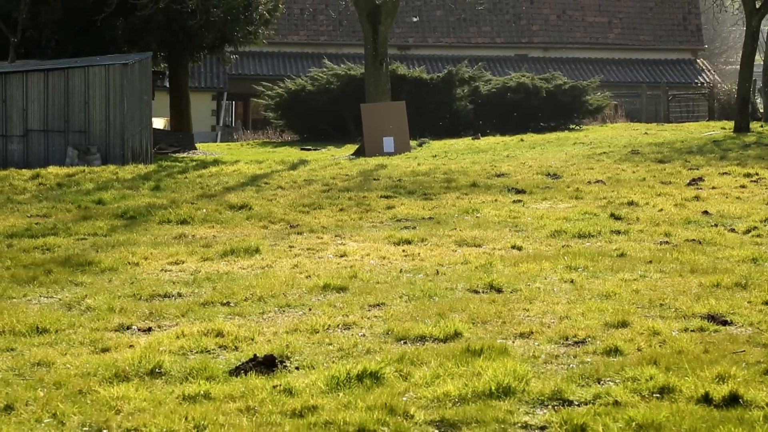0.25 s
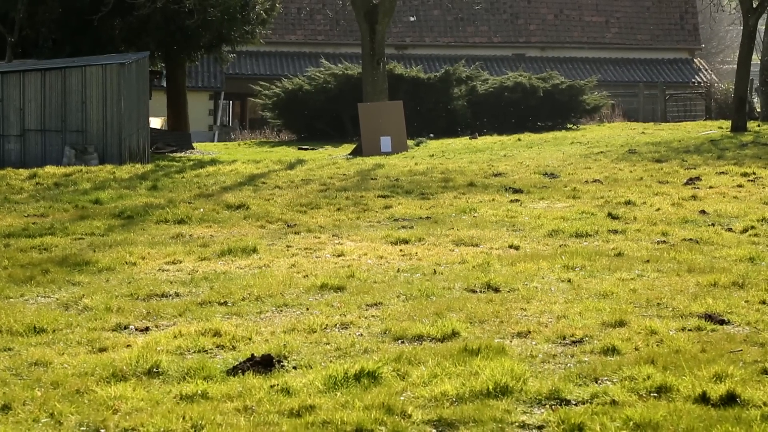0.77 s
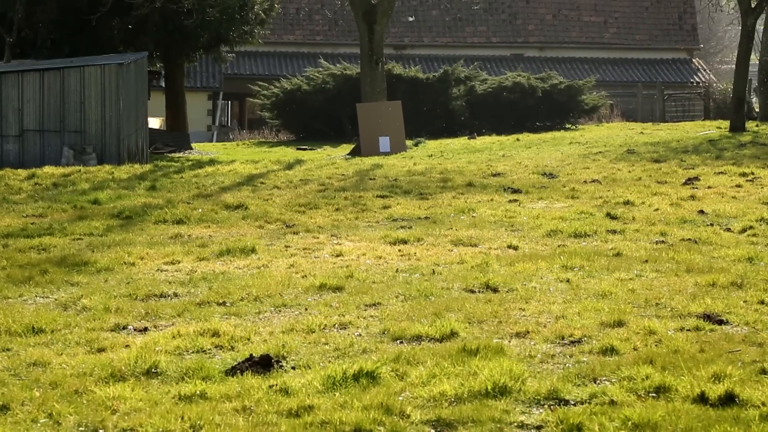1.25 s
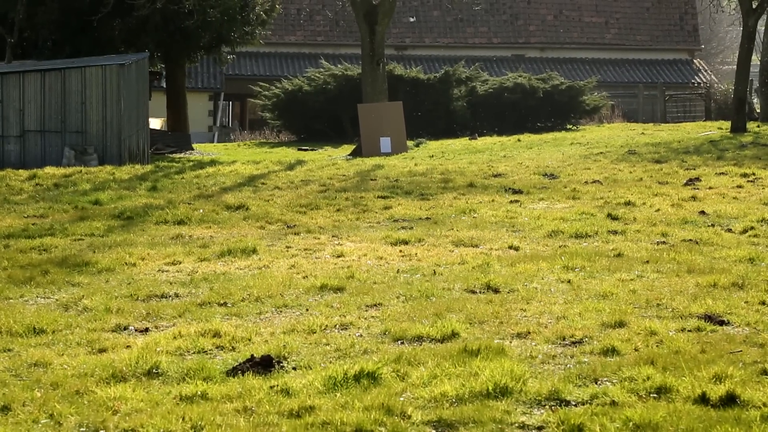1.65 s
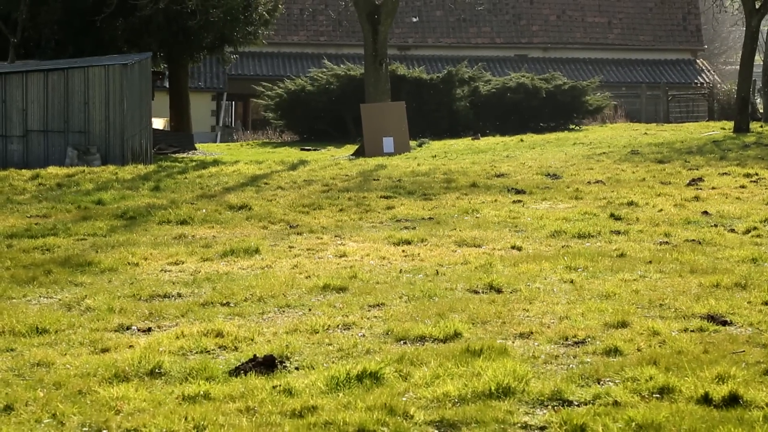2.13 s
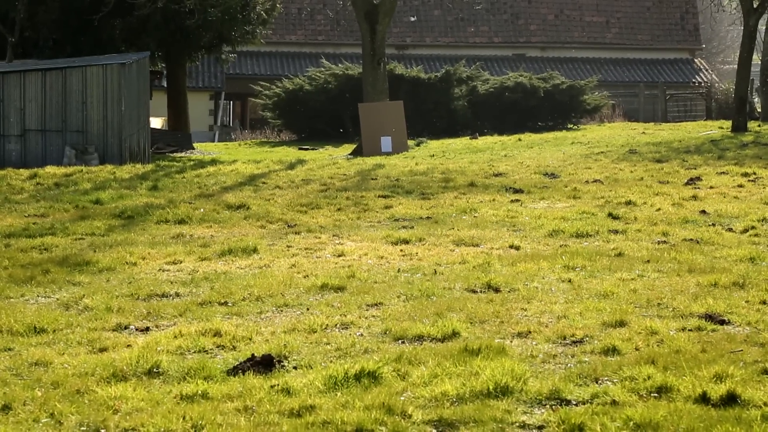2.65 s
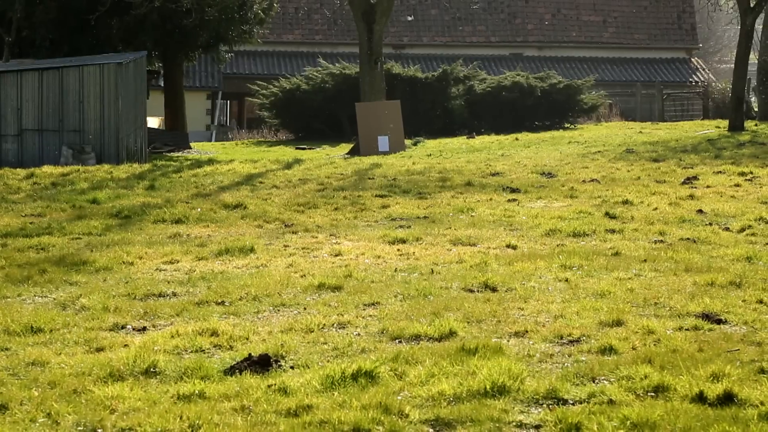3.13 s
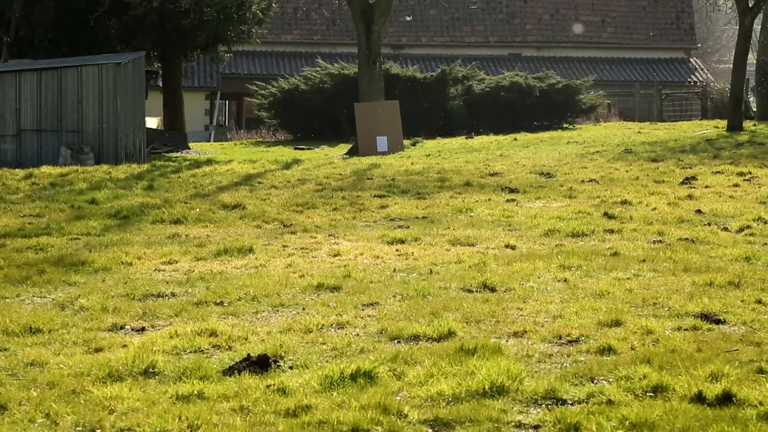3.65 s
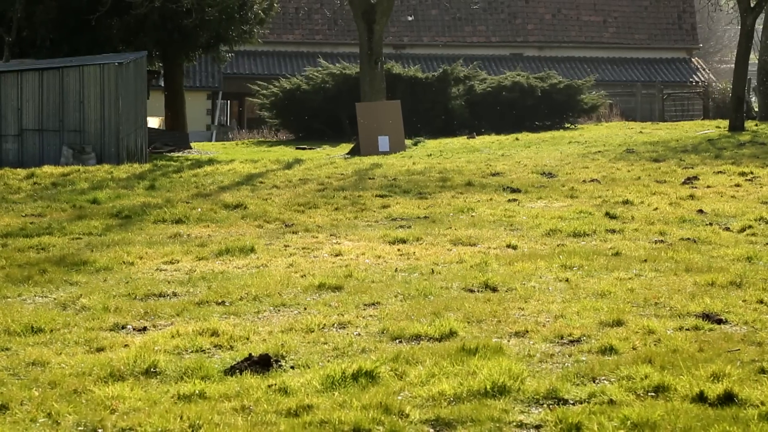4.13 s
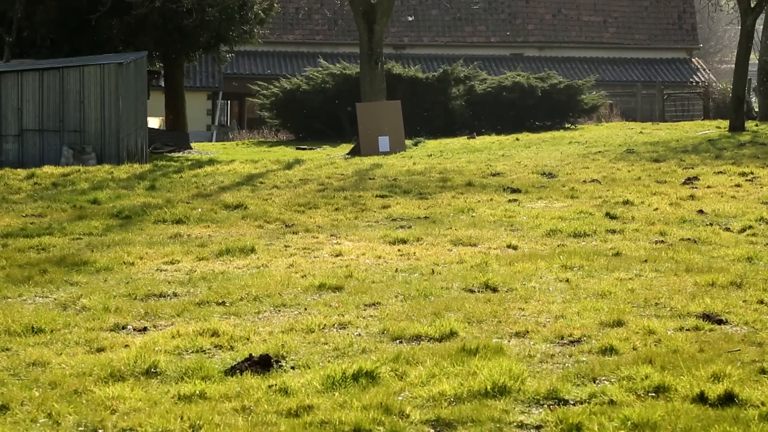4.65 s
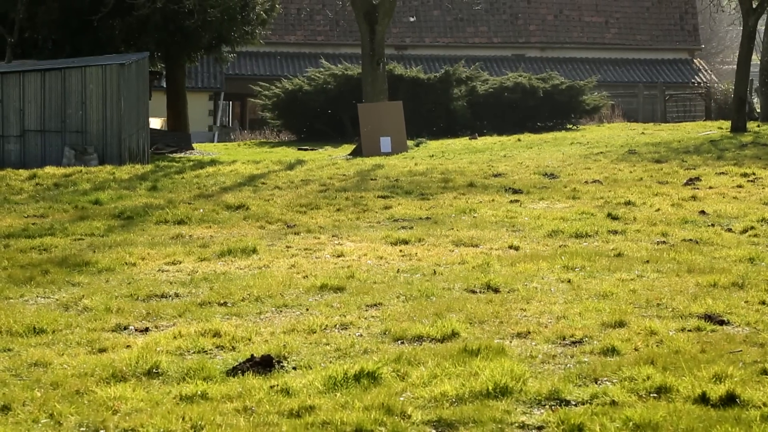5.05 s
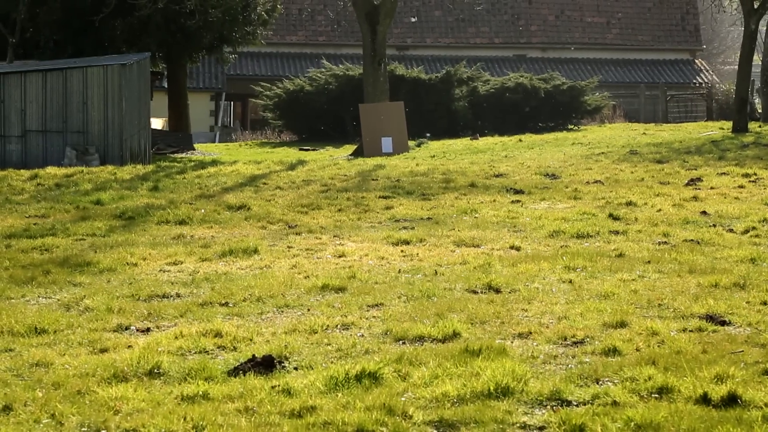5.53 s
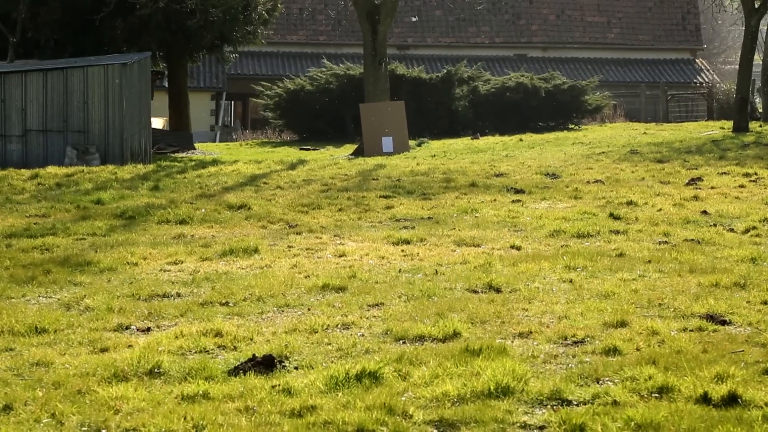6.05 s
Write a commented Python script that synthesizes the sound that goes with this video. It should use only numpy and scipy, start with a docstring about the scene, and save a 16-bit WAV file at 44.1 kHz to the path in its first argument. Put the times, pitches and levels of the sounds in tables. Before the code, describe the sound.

An electric airsoft rifle fires sharp single shots close by, each with a gear whirr, while pellets knock faintly on distant cardboard outdoors.

```python
"""Faint garden air on a lawn. From 0.25 s an electric pellet rifle fires 13 single shots by the microphone:
the motor winds the gears, the piston slams and overloads the input, the gears coast and latch.
Ground and yard echo each shot. From 1.15 s birds sing briefly in gliding near sines.
From 1.4 s five pellets knock on distant cardboard, each a second after its shot;
four short, faint clicks follow each knock as the pellet bounces."""
import sys
import numpy as np
from scipy import signal
from scipy.fft import rfft, irfft
from scipy.io import wavfile
from scipy.ndimage import uniform_filter1d

SR = 44100
rng = np.random.default_rng(int(sys.argv[2]) if len(sys.argv) > 2 else 0)


def put_to_file(sound):
    """Save the sound as 16-bit audio at rate SR, in the file named by the first command-line argument."""
    columns = np.atleast_2d(sound).T  # one column per channel
    safe = np.clip(columns, -1, 1)
    whole_steps = np.round(safe * 32767)
    wavfile.write(sys.argv[1], SR, whole_steps.astype(np.int16))


N = 277389

# Shots. Each row: slam time in seconds, slam level in dB, coasting level in dB, re-engage clack in dB.
SHOTS = [(0.3489, 7.5, -46, -10), (0.7442, 7.5, -42, -11), (1.0144, 8, -41, -9.5), (2.5356, 8, -44.5, -7.5),
         (2.8279, 7, -41, -10.5), (3.3601, 8.5, -45, -10.5), (3.6274, 9.5, -41, -11.5),
         (3.8975, 8, -41.5, -10), (4.155, 6, -39, -10), (5.2154, 6.5, -33, -10.5), (5.5206, 7, -46, -8),
         (5.7745, 6, -41, -9), (6.0823, 7.5, -45, -11.5)]


def undb(db):
    return 10 ** (np.asarray(db) / 20)


def unit(x):
    return x / np.sqrt(np.mean(x ** 2))


def band(x, hz, width_hz):
    """Two-pole resonance, gain 1 at the centre."""
    return signal.lfilter(*signal.iirpeak(hz, hz / width_hz, fs=SR), x)


def butter(x, order, hz, kind):
    return signal.sosfilt(signal.butter(order, hz, kind, fs=SR, output="sos"), x)


def fall(t, t60_s):
    """Silent before 0 s, then decaying."""
    return (t >= 0) * np.exp(-np.log(1000) * np.maximum(t, 0) / t60_s)


def add(out, start_s, x):
    i = int(start_s * SR)
    out[i:i + len(x)] += x[:N - i]


def burst(t, hz, width_hz, t60_s, rise_s):
    """Noise that swells and dies in a steep resonance."""
    shape = fall(t, t60_s) * (1 - np.exp(-np.maximum(t, 0) / rise_s))
    x = band(band(rng.standard_normal(len(t)) * shape, hz, width_hz), hz, width_hz)
    return unit(x) * np.sqrt(np.mean(shape ** 2))


def flicker(rate_hz, depth_db):
    """Randomly wandering gain."""
    k = int(SR / rate_hz)
    return undb(depth_db * unit(uniform_filter1d(uniform_filter1d(rng.standard_normal(N), k), k)))


def reverb(x, tail):
    return signal.fftconvolve(x, tail / np.sqrt(np.sum(tail ** 2)))[:N]


def air():
    """Faint hiss of garden and preamplifier, swelling slowly."""
    # Hiss spectrum. Each row: frequency in Hz, relative density in dB.
    spectrum = [(40, -30.5), (100, -8), (200, -7), (400, -4), (800, -4.5), (1400, -4), (2500, -7.5),
                (5000, -9.5), (9000, -16), (13400, -16), (14200, -44)]
    hz, db = np.transpose(spectrum)
    bins_hz = np.maximum(np.arange(N // 2 + 1) * SR / N, 1)
    gain = undb(np.interp(np.log(bins_hz), np.log(hz), db))
    hiss = irfft(rfft(rng.standard_normal(N)) * gain, N)
    swell = unit(uniform_filter1d(rng.standard_normal(N), SR // 4))
    return undb(-61.5 + 0.76 * swell) * unit(hiss)


def gears():
    """Teeth mesh faster as the motor spins up; strikes and friction ring the shell; coasting is dull."""
    # Shell modes under the teeth. Each row: frequency in Hz, width in Hz, relative gain in dB.
    modes = [(313, 330, -20.5), (548, 140, -1.5), (894, 737, -5.5), (1374, 594, -3), (2158, 220, 1),
             (2680, 420, -5.5), (3230, 240, -3), (4305, 910, -10.5), (7590, 520, -12.5),
             (9800, 12000, -24.5)]
    wind_up_s, coast_after_s, full_mesh_hz, growl_hz = 0.1, 0.024, 1000, 480
    t = np.arange(N) / SR
    speed, drive, coast = np.zeros((3, N))
    for slam_s, _, coast_db, _ in SHOTS:
        on = t > slam_s - wind_up_s
        slack = fall(t - slam_s + wind_up_s, 0.11)  # missing share of full speed
        braked_s = np.maximum(t - slam_s - coast_after_s, 0)
        speed = np.maximum(speed, on * (1 - slack) * fall(braked_s, 0.8))
        idle = np.exp(-((t - slam_s - 0.023) / 0.021) ** 2)  # unloaded until re-engagement
        drive += on * undb(-23 - 22 * slack - 2.5 * idle) * fall(braked_s, 0.22)
        coast += (t > slam_s) * undb(coast_db) * fall(braked_s, 0.28)
    teeth = np.cumsum(speed * full_mesh_hz * (1 + 0.35 * rng.standard_normal(N))) / SR
    strikes = np.diff(np.floor(teeth), prepend=0) * undb(5 + 2.3 * rng.standard_normal(N))
    force = strikes + rng.standard_normal(N)
    bright = 0
    for k, (hz, width_hz, db) in enumerate(modes):
        flare = flicker(190, 2.63)  # the contact point wanders
        hardness = speed ** (hz / 6900)  # slow teeth miss the high modes
        bright += (-1) ** k * undb(db) * flare * hardness * band(force, hz, width_hz)
    bright = unit(bright)
    growl = unit(band(band(force, growl_hz, 250), growl_hz, 250))  # the slowing motor
    dull = unit(band(bright, 1400, 2200)) + undb(-14) * bright + undb(-4) * growl
    whirr = drive * bright + coast * flicker(120, 3.9) * dull
    return butter(whirr, 2, 330, "high")  # the small shell radiates no bass


def knock(hz, db, crack_db, body_db, t60_s):
    """Small metal blow: main ring, bright crack, dull body."""
    t = np.arange(SR // 16) / SR
    ring = burst(t, hz, 1500, t60_s, 0.0011)
    crack = undb(crack_db) * burst(t, 3700, 10000, 0.5 * t60_s, 0.00027)
    body = undb(body_db) * burst(t - 0.0017, 620, 600, 1.7 * t60_s, 0.00071)
    return undb(db) * (ring + crack + body)


def slam():
    """The piston rings the gearbox shell, never twice alike; air puffs from the muzzle."""
    # Shell modes under the slam. Each row: frequency in Hz, relative level in dB, t60 in seconds.
    modes = [(308, -17, 0.0056), (467, -6.5, 0.011), (946.3, 6.5, 0.008), (1214, 6.5, 0.005),
             (2195.5, 8, 0.0051), (2700, -6, 0.0024), (3465, 1, 0.0078), (5304, -7, 0.0098),
             (8370, -26, 0.016)]
    rise_s = 0.000067
    t = np.arange(SR // 12) / SR
    ring = 0
    for k, (hz, db, t60_s) in enumerate(modes):
        spread_db, detune = rng.normal(0, [0.51, 0.01])
        tone = np.sin(2 * np.pi * hz * (1 + detune) * t)
        ring += (-1) ** k * undb(db + spread_db) * tone * fall(t, t60_s)
    puff = undb(-19) * unit(band(rng.standard_normal(len(t)), 2400, 7300)) * fall(t, 0.013)
    return (1 - np.exp(-t / rise_s)) * (ring + puff)


def piston():
    """Release knock, slam with spring hum, clack as the gears re-engage."""
    out, t = np.zeros(N), np.arange(SR) / SR
    for slam_s, slam_db, _, clack_db in SHOTS:
        add(out, slam_s + 0.00066, undb(slam_db) * slam())
        add(out, slam_s - 0.0165, knock(hz=1700, db=-20, crack_db=5.3, body_db=3.6, t60_s=0.034))
        add(out, slam_s + 0.0395, knock(hz=1600, db=clack_db, crack_db=-11.5, body_db=-13.5, t60_s=0.026))
        spring = unit(band(rng.standard_normal(SR), hz=1430, width_hz=70))
        add(out, slam_s, undb(-58.5) * spring * fall(t, t60_s=2.4))
    return out


def latches():
    """Latches, trigger and single teeth click; each sets a small steel pawl shivering."""
    # Each row: start in seconds, level in dB, body knock in dB relative to the ring.
    clicks = [(0.4338, -17.5, -6.5), (0.4418, -23.5, -6.5), (0.8137, -17.5, -16), (0.828, -18.5, -11),
              (1.092, -22, -26), (1.0997, -17.5, -13), (2.4372, -31, -9), (2.5939, -15.5, -22),
              (2.9444, -15.5, -5), (2.9655, -31.5, -10), (3.1067, -19.5, -27.5), (3.2151, -49, -14.5),
              (3.2286, -43.5, -5), (3.4348, -18.5, -26), (3.4428, -21, -11), (3.4554, -27.5, -5.5),
              (3.7319, -11.5, -5), (3.7579, -19, -10.5), (4.0086, -11.5, -5.5), (4.0345, -18.5, -6.5),
              (4.2614, -15.5, -5), (4.2823, -28.5, -16), (5.3219, -18, 0.5), (5.3468, -23, -7.5),
              (5.6236, -13, -3), (5.6487, -21, -12), (5.6613, -34, -3), (5.879, -15, -2),
              (5.906, -20.5, -9), (5.98, -28.5, -9), (6.1892, -20.5, -3)]
    # Pawl modes. Each row: frequency in Hz, level in dB relative to the click.
    pawl = [(2180, -24), (5660, -33), (7220, -31), (8780, -36), (10900, -34)]
    out, t = np.zeros(N), np.arange(SR // 12) / SR
    for start_s, db, body_db in clicks:
        add(out, start_s, knock(hz=2180, db=db, crack_db=-10, body_db=body_db, t60_s=0.02))
        for hz, mode_db in pawl:
            gain = undb(db + mode_db + 4.2 * rng.standard_normal())
            add(out, start_s, gain * burst(t, hz, width_hz=250, t60_s=0.069, rise_s=0.004))
    return out


def shell_rings():
    """Short rings of the gearbox shell."""
    # Each row: time in seconds, level in dB, frequency in Hz.
    rings = [(0.9475, -2.5, 2275), (2.46, -6.5, 2080), (2.5686, -5.5, 2160), (2.8554, -13.5, 2220),
             (3.1073, -25.5, 2193), (3.2849, -19.5, 2190), (3.5593, -5, 2320), (3.8262, -6, 2240),
             (4.0773, -6, 2030), (5.8107, -2.5, 2050), (6.0043, -5, 1980), (6.111, -7, 2160)]
    out, t = np.zeros(N), np.arange(SR // 12) / SR
    for time_s, db, hz in rings:
        add(out, time_s - 0.002, undb(db) * burst(t, hz, width_hz=300, t60_s=0.03, rise_s=0.0055))
    return out


def surroundings(gun):
    """The ground returns a duller copy, which bounces once more; walls and trees scatter a faint tail."""
    # Gain in dB of the first and second ground return.
    returns_db = [-15.5, -28]
    lag_s = 0.00378
    out, t = gun.copy(), np.arange(SR) / SR
    dull = band(gun, 1000, 2200)
    for k, db in enumerate(returns_db, 1):
        add(out, k * lag_s, undb(db) * dull)
    yard = band(rng.standard_normal(SR), 1500, 4200) * fall(t - 0.032, t60_s=0.6)
    return out + undb(-44.5) * reverb(out, yard)


def birds():
    """Near sines that glide, swell, fade and waver with distance; foliage smears them."""
    # Each row: start in seconds, length in seconds, first and last pitch in Hz, mid-note level in dB.
    notes = [(1.154, .08, 4080, 4180, -62), (1.267, 0.047, 4130, 4150, -58.5),
             (1.568, 0.082, 4350, 3750, -59.5), (1.641, 0.032, 4000, 5000, -59),
             (1.679, 0.05, 4296, 4080, -54.5), (1.815, .045, 4900, 3650, -60),
             (1.824, 0.37, 3130, 2810, -51), (1.888, 0.044, 3950, 4300, -58),
             (1.938, 0.031, 5240, 4100, -60), (1.987, 0.089, 4170, 3900, -64),
             (2.107, .05, 4120, 4090, -70), (2.224, .07, 4270, 4340, -74)]
    swell_db = 16.5
    song, t = np.zeros(N), np.arange(N) / SR
    wobble = flicker(60, 0.06)
    for start_s, length_s, first_hz, last_hz, db in notes:
        progress = np.clip((t - start_s) / length_s, 0, 1)
        swell = (progress > 0) * (progress < 1) * undb(db - swell_db * (2 * progress - 1) ** 2)
        pitch_hz = (first_hz + (last_hz - first_hz) * progress) * wobble
        song += np.sqrt(2) * swell * np.sin(2 * np.pi * np.cumsum(pitch_hz) / SR)
    foliage = rng.standard_normal(SR // 4) * fall(t[:SR // 4], t60_s=0.25)
    return song * flicker(90, 2) + undb(-3.5) * reverb(song, foliage)


def pellet_hits():
    """Cardboard cracks, thumps and rattles, its paper sheet shivers; the pellet clicks as it bounces."""
    # Each row: start in seconds, crack, thump, rattle and rustle levels in dB, rustle t60 in seconds.
    hits = [(1.3829, -36, -47.5, -49, -58.5, .9), (1.776, -31.5, -45.5, -48, -53.5, 0.37),
            (2.053, -24, -53, -49.5, -50, 0.37), (4.6667, -35.5, -50, -51, -51, 0.32),
            (4.9347, -25.5, -57, -45.5, -52.5, .3)]
    # Cardboard modes. Each row: frequency in Hz, width in Hz, relative gain in dB.
    modes = [(1370, 740, 7.5), (2820, 2000, -0.5), (3620, 1100, -45), (5870, 320, 10.5), (8100, 5400, -18)]
    # Pellet bounces. Each row: delay in seconds, level in dB relative to the rattle, centre in Hz.
    bounces = [(0.034, 12, 2550), (.118, 9, 2900), (.133, 8.5, 1700), (.164, 6.5, 2480)]
    thump_hz = 213
    out, t = np.zeros(N), np.arange(SR // 2) / SR
    for start_s, crack_db, thump_db, rattle_db, rustle_db, rustle_t60_s in hits:
        noise = rng.standard_normal(len(t))
        card = sum((-1) ** k * undb(db) * band(noise, hz, width_hz)
                   for k, (hz, width_hz, db) in enumerate(modes))
        crack = undb(crack_db) * unit(card) * fall(t, 0.0083)
        thump = undb(thump_db) * np.sin(2 * np.pi * thump_hz * t) * fall(t, 0.065)
        rattle = undb(rattle_db) * burst(t, 2200, 3500, t60_s=0.65, rise_s=0.001)
        rustle = undb(rustle_db) * burst(t, 6700, 3200, rustle_t60_s, rise_s=0.0056)
        add(out, start_s, crack + thump + rattle + rustle)
        for lag_s, bounce_db, hz in bounces:
            add(out, start_s + lag_s, undb(rattle_db + bounce_db) * burst(t, hz, 2500, 0.016, 0.00078))
    return out


def scene():
    gun = gears() + piston() + latches() + shell_rings()
    return (surroundings(gun) + pellet_hits() + birds())[None]


def record(dry):
    """The microphone drops the bass, the input clips and softens the treble, hiss joins, the top is cut."""
    thin = butter(dry, 3, 190, "high")
    soft = butter(np.clip(thin, -0.97, 0.97), 2, 10500, "low")
    return signal.sosfilt(signal.ellip(8, 0.2, 70, 15800, fs=SR, output="sos"), soft + air())


dry = scene()
out = record(dry)
put_to_file(out)
```